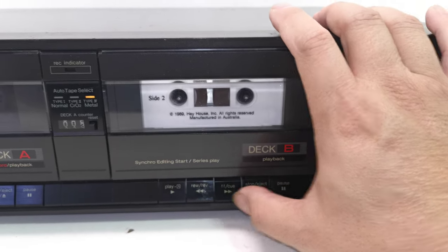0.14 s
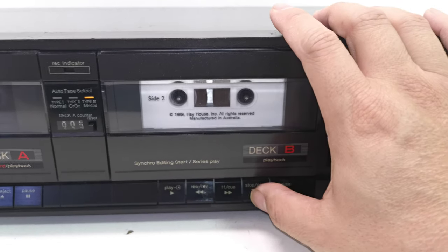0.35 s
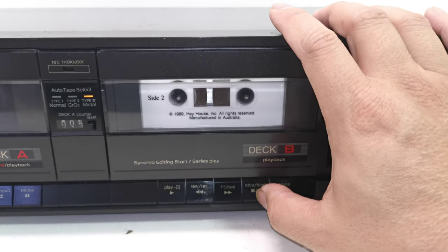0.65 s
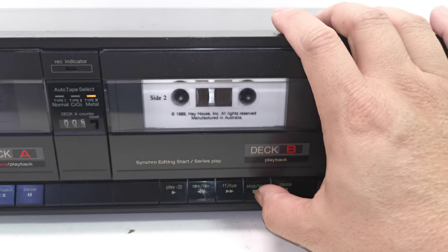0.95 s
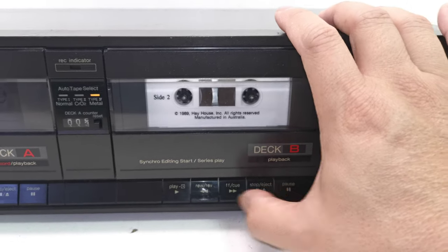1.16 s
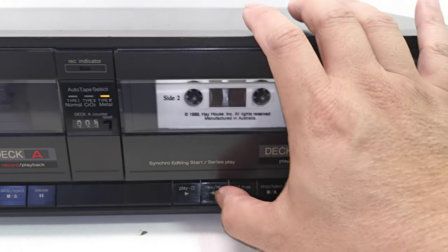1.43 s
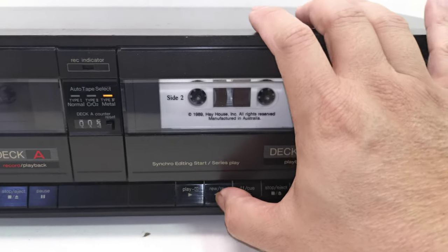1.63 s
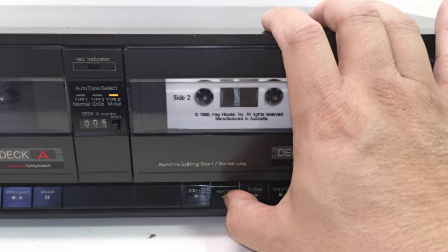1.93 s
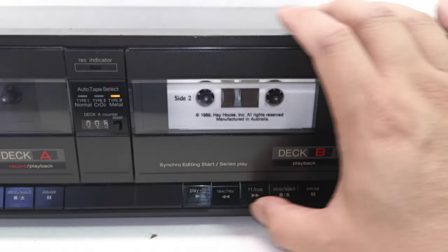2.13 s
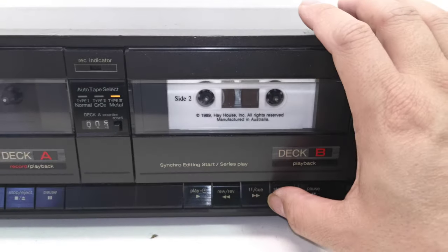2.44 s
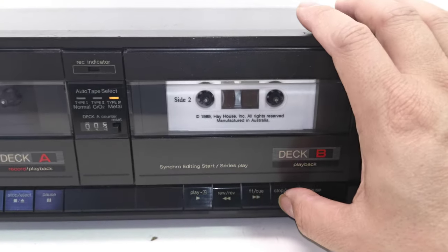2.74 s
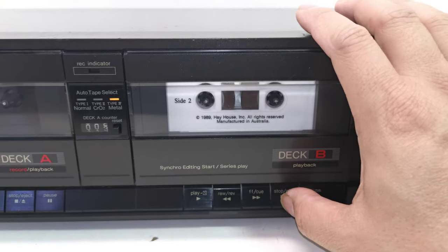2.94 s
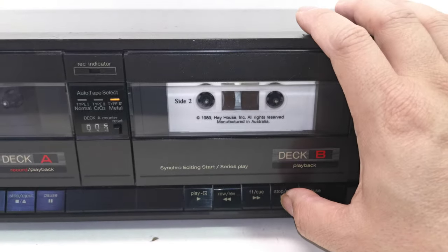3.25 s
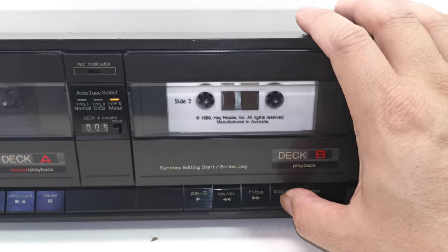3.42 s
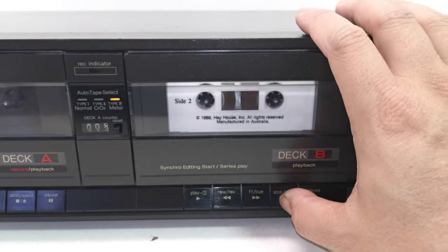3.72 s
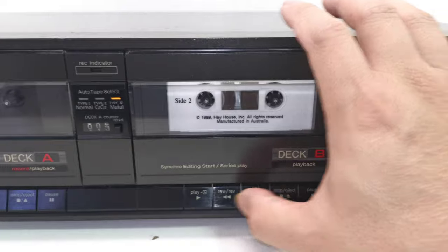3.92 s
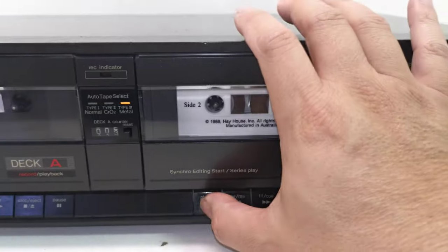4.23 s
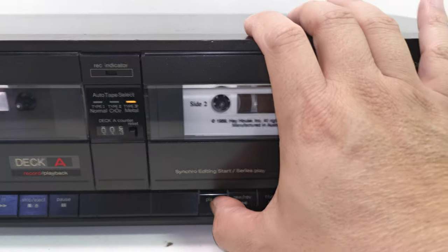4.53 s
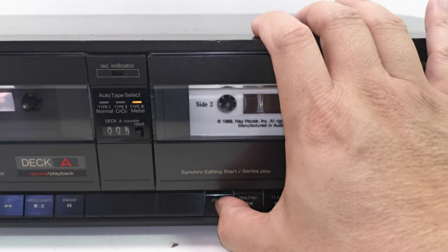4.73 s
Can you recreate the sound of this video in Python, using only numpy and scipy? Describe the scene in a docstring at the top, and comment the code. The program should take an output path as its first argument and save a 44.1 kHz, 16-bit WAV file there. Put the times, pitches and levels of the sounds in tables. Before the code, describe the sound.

A quiet room with faint low rumble and a thin, throbbing high electrical whine, heard close up in stereo. A cassette deck is fast winding: a small motor whirs with a wavering gear hum, light rattle and irregular plastic reel ticks. A double click lands at about 0.2 s. At 1.0 s a loud, bright key snap with a hollow case knock stops it, and the whirr coasts out by about 1.2 s amid a second clack. Skin rubs softly on plastic at 1.3 s. From 1.75 to 2.1 s a run of clunks, strongest near 1.9, engages the tape; a short surge settles into very faint hiss and motor tones, with tiny low bumps at 2.6 and 3.1 s. At 3.7 s the sharpest snap cuts it off, with a lighter clack at 3.85. Another rub follows at 4.1, then small clicks, a solid clunk at 4.55, and a dull motor restart at 4.75.

```python
"""Quiet room, cassette deck close by: a thumb works the piano keys, in stereo.
Key blows are swarms of impacts exciting panels, near reflections and a hollow case; a hand rubs the front.
The reel motor winds (shaped noise, gear mesh, ticks), coasts out, runs (hiss, tones, bumps) and restarts.
A thin electrical whine throbs through mains sidebands; shaped noise makes the rumble of the room."""
import sys
import numpy as np
from scipy import signal
from scipy.fft import rfft, irfft
from scipy.io import wavfile
from scipy.ndimage import uniform_filter1d

SR = 44100
rng = np.random.default_rng(int(sys.argv[2]) if len(sys.argv) > 2 else 0)


def pcm_store(signal):
    """Save signal as 16-bit PCM."""
    levels = np.round(np.clip(np.atleast_2d(signal), -1, 1) * 32767)
    wavfile.write(sys.argv[1], SR, levels.astype(np.int16).T)


N = 214922
T = np.arange(N) / SR  # s

# Spectra below give relative density: (frequency [Hz], density [dB per Hz])
# Left-right correlation of noise: (frequency [Hz], correlation [-1..1])
STEREO_LIKENESS = [(60, 0.98), (290, 0.82), (640, 0.79), (1400, 0.82), (3100, 0.37), (6800, 0),
                   (15000, 0.11)]
# Room rumble and hiss: (frequency [Hz], density [dB per Hz])
ROOM_SPECTRUM = [(12, -31.5), (20, -9.5), (74, 4), (144, -9), (191, -11), (274, -18), (362, -16),
                 (505, -23), (686, -22.5), (1450, -28), (2400, -33), (3450, -36.5), (7730, -31),
                 (8400, -43.5), (15500, -108.5)]
ROOM_RMS_DB = -57.5

# Whine levels: (time [s], left carrier rms [dB], upper sideband rms [dB])
WHINE_LEVELS = [(0, -78, -68), (.4, -66, -71), (.8, -67, -71), (1.3, -80, -72), (2.2, -64, -80),
                (2.8, -62, -82), (3.5, -63, -82), (4.2, -77, -88), (4.87, -71, -69)]
# Whine pitch: (time [s], frequency [Hz])
WHINE_PITCH = [(0, 7793.7), (1.8, 7795.5), (4.87, 7792.4)]
# Other mains sidebands: (multiple of mains [-], left rms [dB], right rms [dB])
WHINE_SIDEBANDS = [(-3, -87, -88), (-2, -83, -81), (-1, -70, -73), (2, -86, -80), (3, -88, -87)]
WHINE_RIGHT_RMS_DB, MAINS_HZ = -69, 50

# Hiss of the running tape: (frequency [Hz], density [dB per Hz])
RUN_SPECTRUM = [(250, -1), (385, -7.5), (534, -13), (620, -13), (1200, -8), (1640, -13.5), (3830, -14),
                (7400, -11), (7900, -5), (8470, -21.5), (12000, -31.5), (15100, -23)]
# Running motor tones: (frequency [Hz], rms [dB])
RUN_TONES = [(392, -80), (620, -80), (763, -79), (900, -82), (1238, -73), (1335, -84)]
# Soft low bumps while running: (time [s], peak [dB])
BUMPS = [(2.61, -57.5), (3.065, -57.5)]
# Dull whirr of the restarting motor: (frequency [Hz], density [dB per Hz])
RESTART_SPECTRUM = [(250, -20), (600, -6), (1500, -6), (1900, -26), (8000, -40)]
RUN_START_S, RUN_STOP_S = 2.11, 3.7
RUN_RMS_DB, RUN_SURGE_DB, RUN_SETTLE_S = -63.5, 12.5, 0.07
BUMP_HZ, BUMP_RISE_S = 385, 0.013
RESTART_S, RESTART_RMS_DB = 4.75, -62

# Fast-winding whirr: (frequency [Hz], density [dB per Hz])
WIND_SPECTRUM = [(150, -16), (366, -7.5), (530, -22), (640, -9), (900, -9.5), (1340, -16), (2350, -20),
                 (5540, -26.5), (7800, -22), (8490, -33), (15500, -59)]
# Whirr resonances: (frequency [Hz], width [Hz], density at peak [dB per Hz])
WIND_RESONANCES = [(199, 30, -5), (210.4, 12, 3.5), (915, 64, -14), (1080, 43, -19), (2708, 89, -8),
                   (3420, 110, -18)]
# Winding motor tones: (frequency [Hz], rms against whirr [dB])
WIND_TONES = [(1250, -22), (2678, -19), (2723, -18)]
# Reel ticks while winding: (time [s], peak [dB])
REEL_TICKS = [(.031, -40.5), (.06, -44), (.112, -44), (.196, -41), (.401, -52), (.525, -45), (.554, -42),
              (.617, -42), (.644, -50), (.66, -41.5), (.772, -44), (.864, -40), (.946, -40), (1.0867, -43)]
WIND_STOP_S, WIND_RMS_DB = 1.097, -53.5
WIND_SURGE_DB, WIND_SETTLE_S, WIND_COAST_DB_PER_S = 4, 0.22, 120.5
MESH_HZ, MESH_WANDER_HZ, MESH_DB, MESH_STOP_S = 723, 3.13, -54, 0.96
REEL_TURNS_PER_S, MESH_FLUTTER_DB = 13, 3.1
RATTLE_PER_S, RATTLE_DB = 150, -58
TICK_TILT = 1.3  # power of frequency: ticks are brighter than blows

# Hand slides to the next key: (start [s], length [s], rms at crest [dB])
HAND_SLIDES = [(1.295, 0.17, -67), (4.054, .2, -66.5)]
# Rub of skin on plastic: (frequency [Hz], density [dB per Hz])
SLIDE_SPECTRUM = [(300, -28), (950, -6), (2410, -2), (3430, -10), (7400, -5.5), (9620, -30)]

# Key and lever blows: (time [s], knock [dB], clack [dB], snap [dB], case thump [dB], clatter [s])
BLOWS = [(.223, -43, -43, -53, -63, 0.0033), (0.238, -42.5, -38, -37.5, -48, 0.0036),
         (0.9806, -27, -28.5, -20.5, -36, 0.0063), (1.134, -52, -54, -69, -70, 0.0047),
         (1.145, -38, -37, -35, -37, 0.0056), (1.466, -58, -56, -77, -71, .0044),
         (1.602, -60, -64, -85, -65, 0.0052), (1.754, -40.5, -43, -47.5, -53, 0.0041),
         (1.812, -52, -61, -64.5, -55, 0.014), (1.861, -41.5, -42.5, -47, -66, 0.011),
         (1.878, -32.5, -29.5, -29.5, -28.5, 0.0084), (1.988, -51, -55, -59.5, -43, 0.0041),
         (2.031, -39, -44.5, -45.5, -37.5, 0.0069), (2.097, -40.5, -39.5, -39, -51, 0.0029),
         (2.897, -62, -69, -67, -62.5, .0043), (3.049, -64.5, -68, -72, -56, 0.0069),
         (3.603, -62, -67, -58.5, -59, .0024), (3.6991, -25.5, -28.5, -18.5, -31.5, 0.0029),
         (3.822, -43, -49.5, -71, -70, 0.016), (3.841, -41.5, -34, -38.5, -40, 0.0034),
         (3.859, -44.5, -56.5, -39.5, -80, 0.0044), (4.26, -59, -54.5, -75, -74, 0.0043),
         (4.351, -51.5, -52.5, -66, -62, 0.0026), (4.447, -53.5, -64, -79, -65, 0.0054),
         (4.521, -45, -46.5, -55, -62, 0.0088), (4.544, -33.5, -33, -33.5, -32.5, 0.0069),
         (4.612, -41, -39.5, -46, -53, 0.0038), (4.726, -48.5, -53, -77, -73, 0.0044),
         (4.738, -46, -47.5, -60.5, -63, 0.0059)]
# Band centres of knock, clack, snap: (frequency [Hz])
BAND_CENTRES_HZ = (800, 2400, 7000)
# Colour of a blow in the case: (frequency [Hz], density [dB per Hz])
CASE_SPECTRUM = [(180, -7.5), (300, -1.5), (535, -15), (620, 4.5), (685, 2), (835, 5), (1460, -0.5),
                 (1640, -0.5), (1810, -4), (2740, -5.5), (4070, -15), (7500, -10.5), (9760, -34.5),
                 (14500, -44.5), (15500, -52)]
# Ringing panels and metal plates: (frequency [Hz], relative level [dB], t60 [s])
PANEL_MODES = [(626.4, -1.5, 0.11), (845, 7, 0.15), (892, -12, 0.47), (1170, -11.5, 0.074), (1270, -12, .1),
               (1694, 2, 0.025), (2590, -11.5, .12), (3312, 3.5, 0.012)]
# Hollow-case modes: (frequency [Hz], relative level [dB], t60 [s])
HOLLOW_MODES = [(207.6, -2, 0.35), (226.6, -8.5, 0.33), (286.8, -5, 0.17)]
# Dull push on the case: (frequency [Hz], density [dB per Hz])
THUD_SPECTRUM = [(50, -14), (110, -4), (280, -9.5), (450, -5.5), (700, -52), (2000, -91.5)]
# Nearby reflections: (frequency [Hz], t60 [s])
REFLECTION_T60 = [(300, 0.28), (1000, 0.12), (3000, 0.13), (7500, 0.086), (12000, 0.12)]
# Key position in the stereo image: (time [s], left minus right [dB])
KEYS_PAN = [(0, -3), (1.5, 0.6), (2.1, 0.6), (3.7, -3.5), (4.3, -6.5), (4.87, -5.5)]
BLOW_LEAD_S = 0.01  # quiet before each blow
EDGE_HZ = 15600  # recorder cutoff


def gain_of(db):
    """Decibels to amplitude gain."""
    return 10 ** (np.asarray(db) / 20)


def evened(x):
    """Scales to rms 1."""
    return x / np.sqrt(np.mean(x ** 2) + 1e-20)


def read(points, hz):
    """Interpolates a spectrum on a log frequency axis."""
    f, value = np.transpose(points)
    return np.interp(np.log(hz + 1), np.log(f + 1), value)


def curve(rows, column=1):
    """Interpolates one table column at every sample."""
    rows = np.array(rows)
    return np.interp(T, rows[:, 0], rows[:, column])


def add(mix, time_s, sound):
    """Mixes a stereo sound in at time_s."""
    part = mix[:, round(time_s * SR):][:, :sound.shape[1]]
    part += sound[:, :part.shape[1]]


def sine(hz):
    """Steady sine of rms 1."""
    return np.sqrt(2) * np.sin(2 * np.pi * hz * T)


def hiss(gain, patchy_db, length=N, size=1024):
    """Stereo noise from random short-time spectra, shaped by gain(hz, t) and random patches."""
    hop = size // 4
    frames, hz = length // hop + 5, np.fft.rfftfreq(size, 1 / SR)
    a, b, c, d, patches = rng.standard_normal((frames, len(hz), 5)).T
    patches = uniform_filter1d(patches, size=10, axis=0)
    patches = evened(uniform_filter1d(patches, size=10, axis=1))
    same = np.clip(read(STEREO_LIKENESS, hz), -1, 1)[:, None]
    left = a + 1j * b
    right = same * left + np.sqrt(1 - same ** 2) * (c + 1j * d)
    spectra = np.array([left, right])
    spectra *= gain(hz[:, None], np.arange(frames) * hop / SR) * gain_of(patchy_db * patches)
    return signal.istft(spectra, nperseg=size, noverlap=size - hop)[1][:, :length]


def noise(spectrum, patchy_db, size=1024):
    """Stereo noise of rms 1 with a fixed spectrum."""
    return evened(hiss(lambda hz, t: gain_of(read(spectrum, hz)), patchy_db, size=size))


def rings(modes, t):
    """Resonant modes: a sum of exponentially dying sines at random phase."""
    return sum(gain_of(db - 60 * t / t60) * np.sin(2 * np.pi * hz * t + 2 * np.pi * rng.random())
               for hz, db, t60 in modes)


def room():
    """Low rumble and faint hiss as shaped noise."""
    return gain_of(ROOM_RMS_DB) * noise(ROOM_SPECTRUM, 1.37, size=2048)


def whine():
    """A high tone whose sidebands at mains spacing beat with it into a throb."""
    turn = 2 * np.pi * np.cumsum(curve(WHINE_PITCH)) / SR
    mains = 2 * np.pi * MAINS_HZ * T
    lead = np.array([[1.0], [0]])  # rad, left ahead of right
    carrier_db = [curve(WHINE_LEVELS), np.full(N, WHINE_RIGHT_RMS_DB)]
    out = gain_of(carrier_db) * np.sin(turn + lead)
    out += gain_of(curve(WHINE_LEVELS, column=2)) * np.sin(turn + mains + 2 * lead + 1)
    for k, *db in WHINE_SIDEBANDS:
        phase = lead + (k * k - 1) / 3  # outer ones out of step: softer throb
        out += gain_of(db)[:, None] * np.sin(turn + k * mains + phase)
    return np.sqrt(2) * out


def bumps():
    """Soft low bumps: a sine under a quick swell and slower decay."""
    out = np.zeros(N)
    for time_s, db in BUMPS:
        u = np.maximum(T - time_s, 0) / BUMP_RISE_S
        out += gain_of(db) * u * np.exp(1 - u) * np.sin(2 * np.pi * BUMP_HZ * T)
    return out


def restart():
    """The motor picks up again after the last key: dull shaped noise fading in."""
    rise = np.clip((T - RESTART_S) / 0.023, 0, 1)
    return gain_of(RESTART_RMS_DB) * rise * noise(RESTART_SPECTRUM, 2.5)


def running():
    """Moving tape: shaped hiss with a starting surge, plus steady motor tones."""
    surge_db = RUN_SURGE_DB * np.exp(-abs(T - RUN_START_S) / RUN_SETTLE_S)
    tape = noise(RUN_SPECTRUM, 1.3) * gain_of(RUN_RMS_DB + surge_db)
    tones = sum(gain_of(db) * sine(hz) for hz, db in RUN_TONES)
    on = np.clip(np.minimum(T - RUN_START_S, RUN_STOP_S - T) / 0.003, 0, 1)
    return on * (tape + tones)


def tick():
    """One small plastic tick of peak 1: a fast-dying burst of case-coloured noise."""
    def burst(hz, t):
        return gain_of(read(CASE_SPECTRUM, hz) - 60 * t / 0.043) * (hz / SR) ** TICK_TILT
    sound = hiss(burst, 1.3, length=4096, size=128)
    return sound / abs(sound).max()


def whirring():
    """Winding motor: resonant noise and tones, louder at first, then coasting out."""
    def whirr(hz, t):
        peaks = sum(gain_of(db) / (1 + (2 * (hz - f) / width) ** 2) for f, width, db in WIND_RESONANCES)
        return gain_of(read(WIND_SPECTRUM, hz)) + peaks
    tones = sum(gain_of(db) * sine(hz) for hz, db in WIND_TONES)
    surge_db = WIND_SURGE_DB * np.exp(-T / WIND_SETTLE_S)
    coast_db = WIND_COAST_DB_PER_S * np.maximum(T - WIND_STOP_S, 0)
    return (evened(hiss(whirr, 3.4, size=2048)) + tones) * gain_of(WIND_RMS_DB + surge_db - coast_db)


def gear_mesh():
    """Wandering tooth tone with half-frequency partials; off-centre gears throb, each reel turn swells."""
    wander = uniform_filter1d(rng.standard_normal(N), size=900)
    wander = evened(uniform_filter1d(wander, size=900))
    turn = 2 * np.pi * np.cumsum(MESH_HZ + MESH_WANDER_HZ * wander) / SR
    throb = 1 + 0.59 * np.sin(2 * np.pi * 27.0 * T) + 0.27 * np.sin(2 * np.pi * 8.2 * T)
    half = gain_of(-7.5 + 2.5 * wander) * throb * np.sin(turn / 2)
    mesh = np.sin(turn) + half + gain_of(-14) * np.sin(1.5 * turn)
    flutter_db = MESH_FLUTTER_DB * np.cos(2 * np.pi * REEL_TURNS_PER_S * T)
    return np.sqrt(2) * gain_of(MESH_DB + flutter_db) * mesh


def rattle(meshing):
    """Loose parts: ticks at random times and strengths."""
    loose = (rng.random(N) < RATTLE_PER_S / SR) * rng.standard_normal(N) * meshing
    return gain_of(RATTLE_DB) * signal.oaconvolve(loose[None], tick(), axes=1)[:, :N]


def winding():
    """Fast winding: whirr, gear mesh, reel ticks and rattle."""
    meshing = np.clip((MESH_STOP_S - T) / 0.012, 0, 1)
    out = whirring() + gear_mesh() * meshing
    for time_s, db in REEL_TICKS:
        add(out, time_s, gain_of(db) * tick())
    return out + rattle(meshing)


def hand():
    """Skin rubbing plastic: shaped noise, quick to start and slow to fade."""
    swells = sum(gain_of(db) * np.sin(np.pi * np.clip((T - start_s) / length_s, 0, 1) ** 0.54)
                 for start_s, length_s, db in HAND_SLIDES)
    return noise(SLIDE_SPECTRUM, 2.4, size=256) * swells


def impacts(t, hz, clatter_s):
    """Left-right spectra of a swarm of tiny impacts exciting reflections and panels."""
    u = 2 * np.maximum(t - BLOW_LEAD_S, 0) / np.clip(clatter_s, 0.0005, 0.03)  # densest at u = 2
    grains = rng.standard_normal(len(t)) * gain_of(2.0 * rng.standard_normal(len(t)))
    drive = rfft(grains * u ** 2 * np.exp(-u))

    def decay(f, s):  # near surfaces die fast, the room lingers faintly
        return gain_of(-60 * s / read(REFLECTION_T60, f)) + gain_of(-20 - 60 * s / 0.35)
    tail = hiss(decay, 0.4, length=len(t), size=128)
    tail /= np.linalg.norm(tail[0])
    lag = np.exp(2j * np.pi * hz * 0.00004 * rng.standard_normal((2, 1)))  # random direct delay per side
    crack = drive * (rfft(tail) + lag)
    power = (abs(crack) ** 2).mean(0)
    crack /= np.sqrt(uniform_filter1d(power, size=150))  # many small parts: an even crack
    crack *= gain_of(read(CASE_SPECTRUM, hz))
    ringing = drive * rfft(rings(PANEL_MODES, t))
    return crack / np.linalg.norm(crack[0]) + gain_of(-5) * ringing / np.linalg.norm(ringing)


def case_thump(t, hz, clatter_s):
    """Hollow-case modes that build up as the clatter goes on, plus a dull thud."""
    late = np.maximum(t - BLOW_LEAD_S, 0) / (0.0071 + 1.03 * clatter_s)
    thud = irfft(rfft(rng.standard_normal(len(t))) * gain_of(read(THUD_SPECTRUM, hz)))
    thud *= late * np.exp(-late / 1.62)
    hollow = rings(HOLLOW_MODES, t) * (1 - np.exp(-late)) ** 2
    return hollow / abs(hollow).max() + gain_of(-4.0) * thud / abs(thud).max()


def blow(knock_db, clack_db, snap_db, thump_db, pan_db, clatter_s, length=16384):
    """Key or lever blow: impacts levelled in three bands, then the case thump."""
    t, hz = np.arange(length) / SR, np.fft.rfftfreq(length, 1 / SR)
    heard = impacts(t, hz, clatter_s)
    sound = gain_of(thump_db) * case_thump(t, hz, clatter_s)
    for k, db in enumerate((knock_db, clack_db, snap_db)):
        band = np.interp(np.log(hz + 1), np.log(BAND_CENTRES_HZ), np.eye(3)[k])
        part = irfft(heard * band)
        peak_power = uniform_filter1d(part.mean(0) ** 2, size=88).max()  # 2 ms window
        sound = sound + gain_of(db) * part / np.sqrt(peak_power)
    return sound * signal.windows.tukey(length, 0.04) * gain_of([[pan_db / 2], [-pan_db / 2]])


def keys():
    """All key and lever blows, panned to where the keys lie at that moment."""
    out, pan_db = np.zeros((2, N)), curve(KEYS_PAN)
    for time_s, knock_db, clack_db, snap_db, thump_db, clatter_s in BLOWS:
        pan = pan_db[round(time_s * SR)]
        add(out, time_s - BLOW_LEAD_S, blow(knock_db, clack_db, snap_db, thump_db, pan, clatter_s))
    return out


def scene():
    """The deck in its room."""
    motor = running() + bumps() + restart() + winding()
    return room() + whine() + motor + hand() + keys()


def record(dry):
    """Band limit of the recorder: linear-phase low-pass."""
    lowpass = signal.firwin(511, EDGE_HZ, window=("kaiser", 9), fs=SR)
    return signal.oaconvolve(dry, lowpass[None], "same")


dry = scene()
out = record(dry)
pcm_store(out)
```